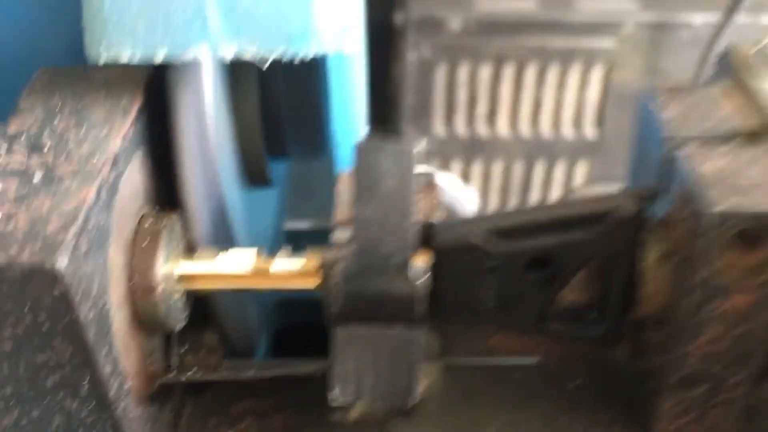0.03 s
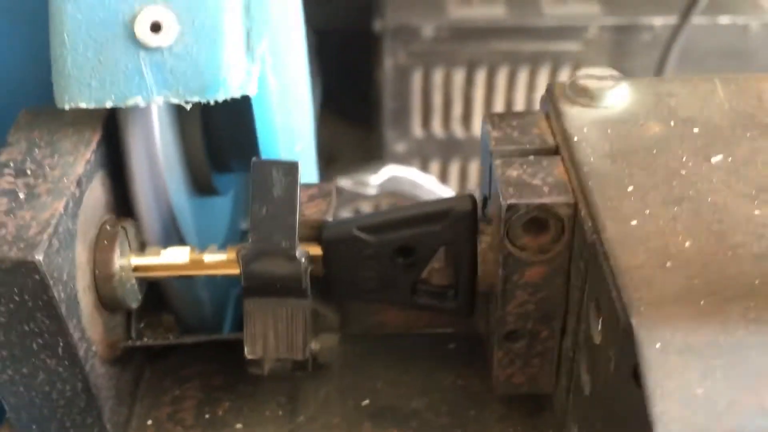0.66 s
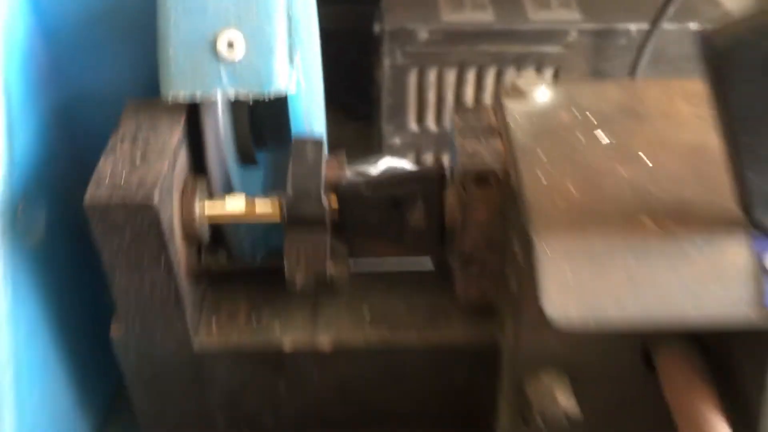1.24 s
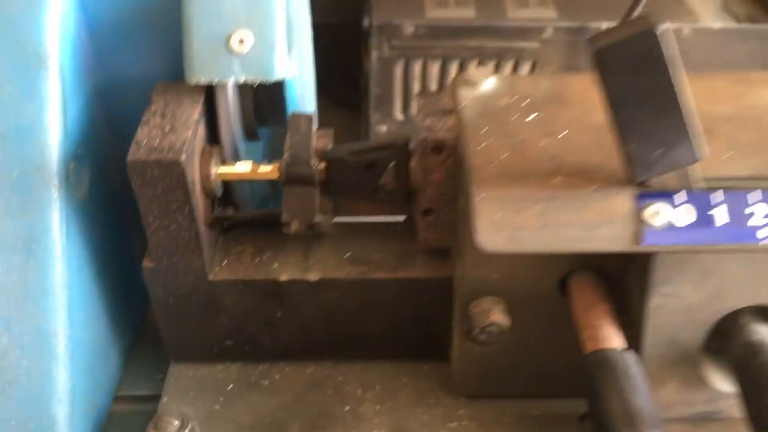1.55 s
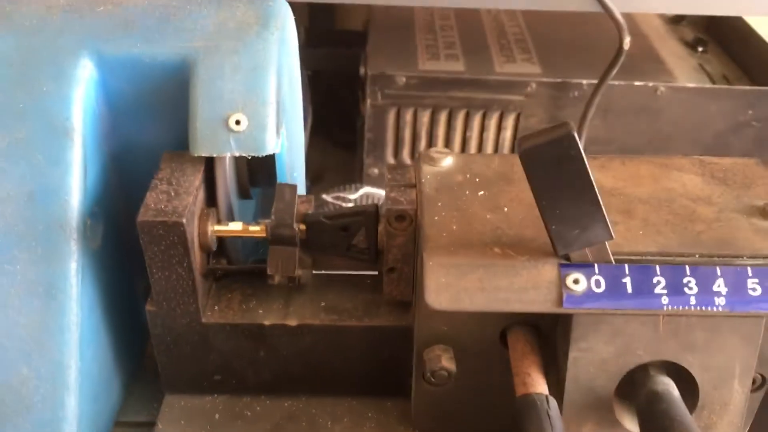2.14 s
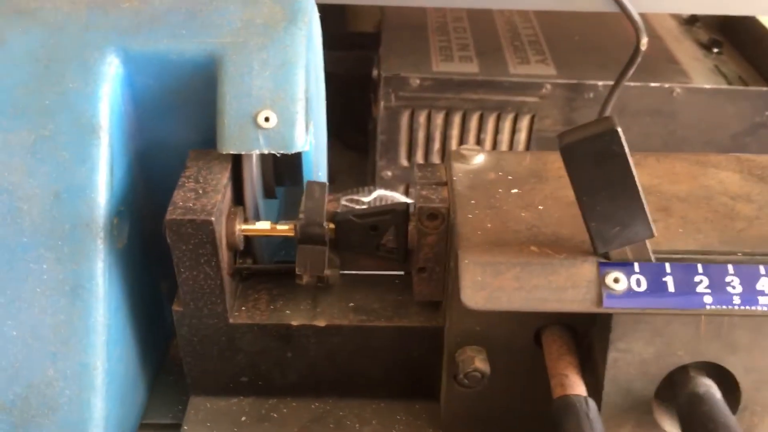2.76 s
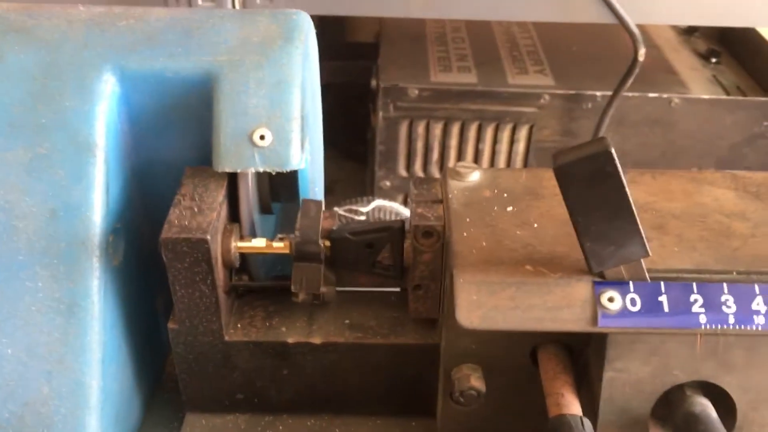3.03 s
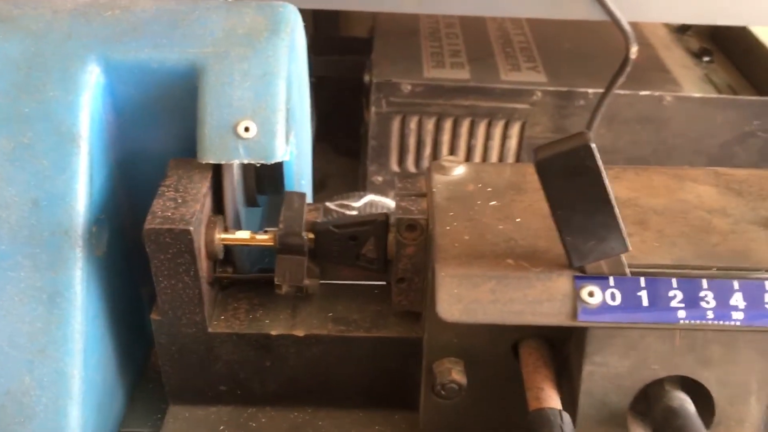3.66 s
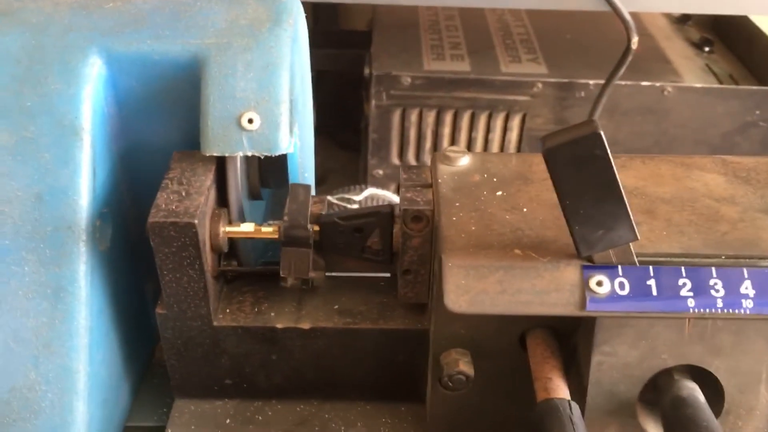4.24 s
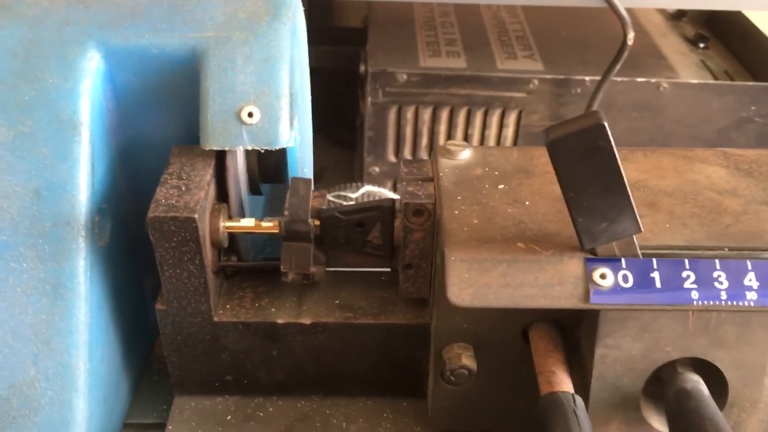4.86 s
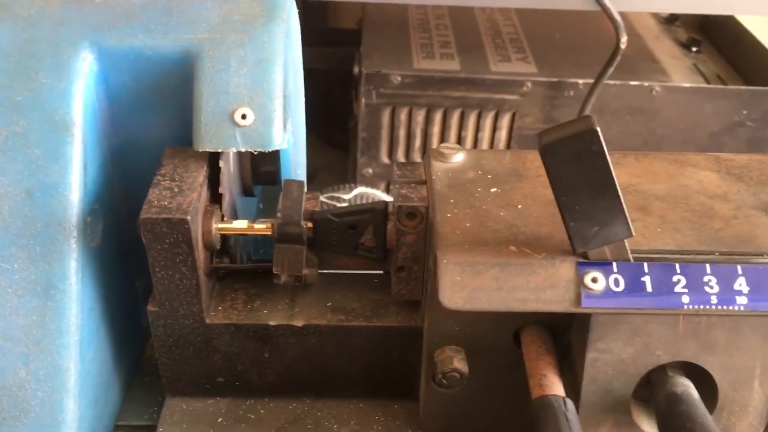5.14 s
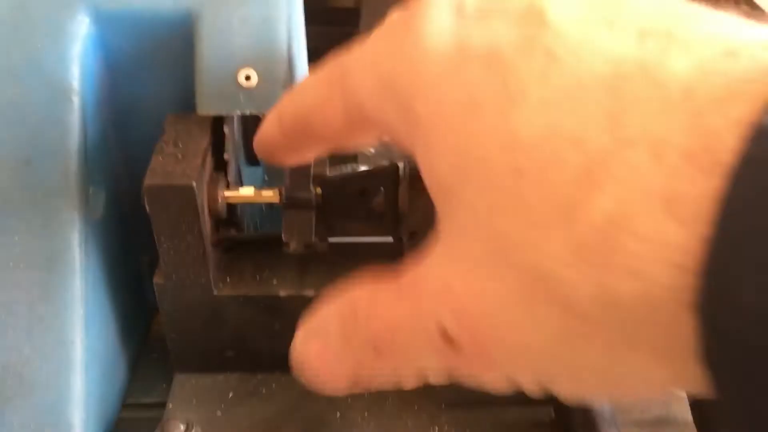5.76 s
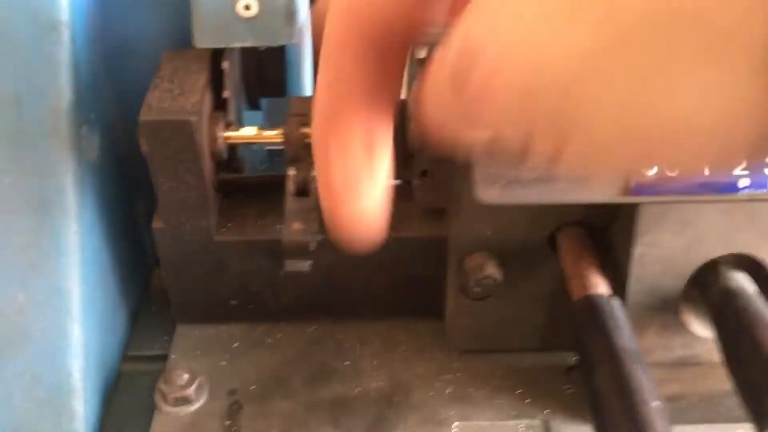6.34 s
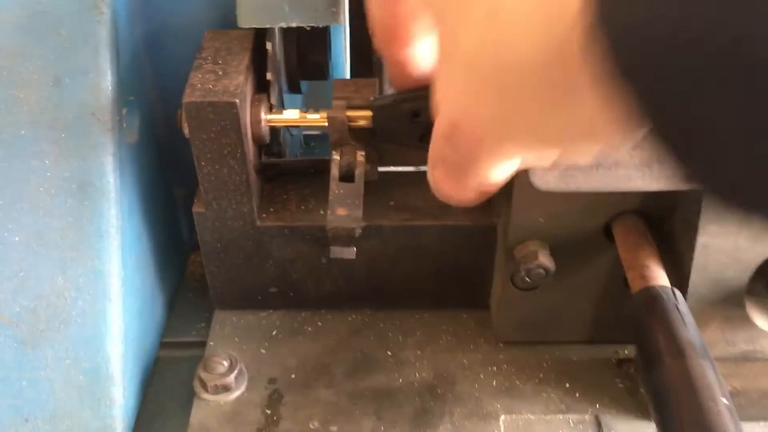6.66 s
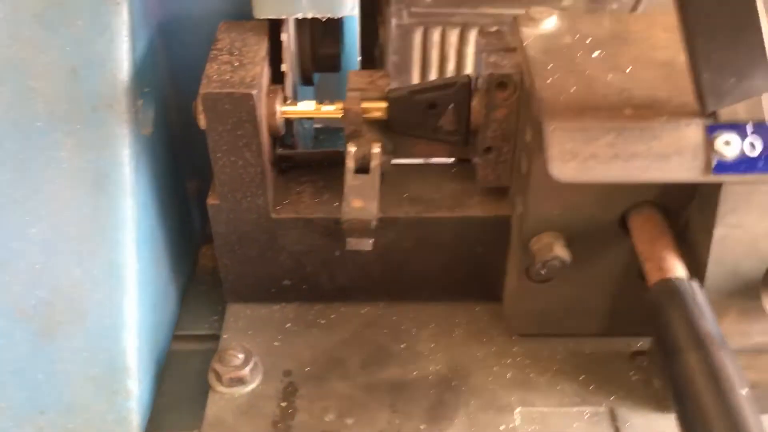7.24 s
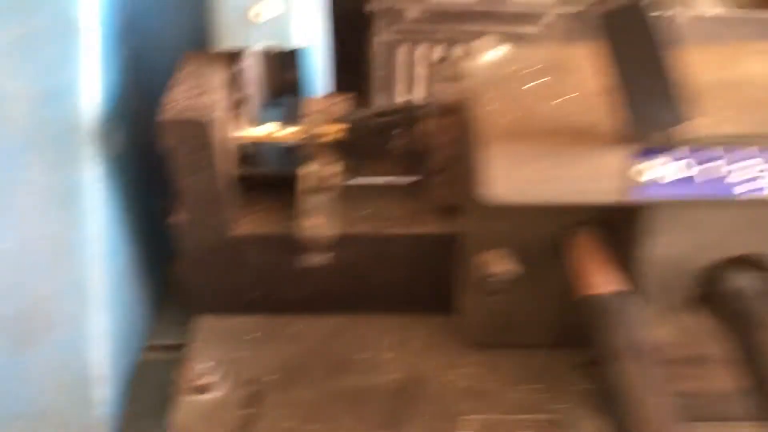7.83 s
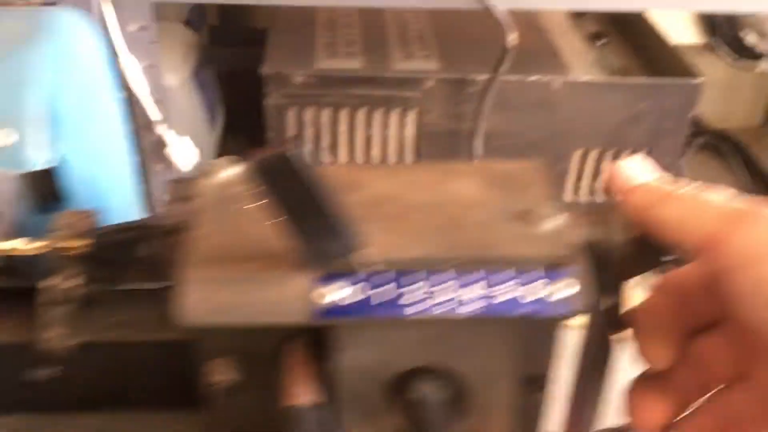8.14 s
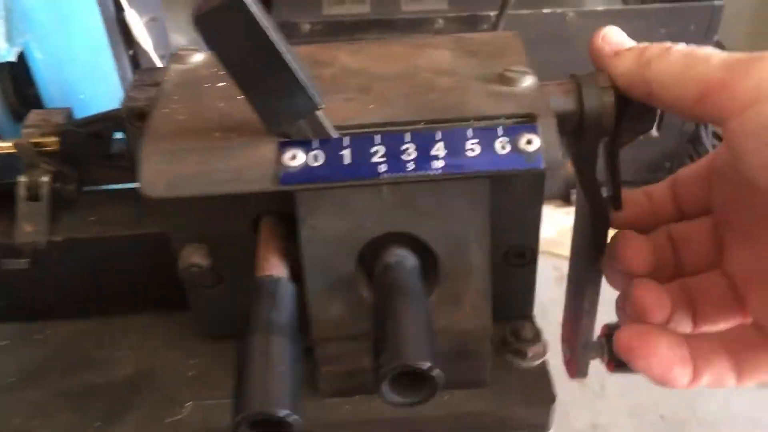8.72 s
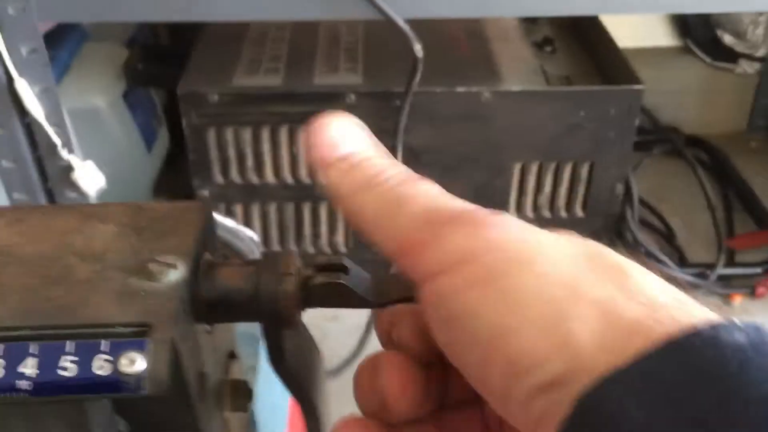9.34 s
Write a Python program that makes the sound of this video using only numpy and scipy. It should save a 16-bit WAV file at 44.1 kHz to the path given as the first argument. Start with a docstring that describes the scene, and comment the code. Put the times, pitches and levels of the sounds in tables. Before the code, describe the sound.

A key cutting machine is already running close to the microphone: a loud, harsh, whirring rasp and hiss over motor whine and hum, with dull housing booms in the first second. From about 0.6 to 1.9 seconds the sound softens slightly as the microphone draws back. At 2.4 seconds a switch snaps and the whine dies. The wheel coasts, with a low shudder near 3 seconds and a slowing swish. From 3.3 seconds it taps lightly and repeatedly on the key, then stops with a few clicks at 5 seconds. After a lull, the metal clamp clicks open around 6.2 to 6.4 seconds with a low thump, followed by small ticks and faint, squeaky scrapes. The steel carriage knocks with a short ring at 7.5 and 7.7 seconds. Soft sliding leads to a crank clunk near 9.4 seconds. A low workshop rumble lies underneath throughout.

```python
"""A harsh, whirring rasp close by: a key cutting machine, its rough wheel scraping the same way on every
turn over the whine and hum of the motor. The listener draws back, the switch snaps off and the wheel
coasts to rest, swishing once a turn and knocking on the key. A hand then clicks the clamp open, shifts
the steel carriage against its stops and takes hold of the crank, over a small workshop's low rumble."""
import sys
import numpy as np
from scipy import signal
from scipy.fft import rfft, irfft, next_fast_len
from scipy.io import wavfile

SR = 44100
rng = np.random.default_rng(int(sys.argv[2]) if len(sys.argv) > 2 else 0)


def inscribe(sig):
    """Save sig as 16-bit PCM at rate SR to the path in sys.argv[1].

    A 1-D sig is mono; a 2-D sig holds one channel per row.
    Samples are clipped to [-1, 1] before scaling.
    """
    pcm = np.round(np.clip(np.atleast_2d(sig).T, -1, 1) * 32767)
    wavfile.write(sys.argv[1], SR, pcm.astype(np.int16))


N = 418509
TIME = np.arange(N) / SR
FREQS = np.maximum(np.arange(N // 2 + 1) * SR / N, 1)
SWITCH_OFF_S, HIGH_SPOT_S = 2.43, 4.487  # turns are counted from this pass of the wheel's high spot

# shaft speed, steady under power, then braked by friction: time_s, turns_per_s
SHAFT_SPEED = [(0, 59.17), (2.41, 59.17), (2.52, 47), (3.52, 28.17), (4.457, 10.95), (4.99, 0)]
# waviness of the rim: waves_per_turn, width_waves, boost_db
RIM_WAVES = [(6.5, 1.6, 6), (10.2, 1.6, 9.5), (16, 2, 7), (22, 2, 4), (26, 1.2, 4), (30, 1.8, 6),
             (43, 2.6, 7), (67, 6, 3.5), (77, 5, 3.5)]
# nicks in the rim: after_high_spot_turns, relative_jolt_db
RIM_NICKS = [(-.01, 3.5), (0.27, 1.5)]
# tone curves of the wheel's rasp and the rim's hiss: frequency_hz, gain_db
RASP_COLOUR = [(30, -32.5), (50, -27), (170, -13.5), (260, -4.5), (520, -2), (720, 2.5), (1150, 0),
               (2200, -1), (3600, -1.5), (4700, -7), (5600, 1), (7000, -3), (8000, -14), (10000, -26)]
HISS_COLOUR = [(5000, -15.5), (7600, -7), (8600, -3), (9900, -2.5), (10450, -5.5), (11000, -3.5),
               (11900, -1.5), (12500, -1.5), (13300, -2), (15700, -5), (17000, -23.5)]
# resonances of the frame and of the wheel: pitch_hz, width_hz, gain_db
FRAME_RESONANCES = [(248, 80, 6.5), (449.6, 55, 9.5), (680, 80, -6), (870, 22, -9), (951, 50, 12.5),
                    (1037, 55, 5), (1500, 56, 5.5), (1710, 80, 8), (1985, 63, 7.5), (2403, 60, 8.5),
                    (2650, 89, 5), (2717, 91, 5), (2990, 170, 7), (3993, 48, 8.5), (4330, 100, 10),
                    (5100, 70, 1.5), (6240, 55, 5.5), (6980, 220, 8.5)]
WHEEL_RESONANCES = [(1225, 52, 5), (1578, 130, -2), (1800, 180, -6), (1990, 130, -5.5), (2260, 91, -5),
                    (2490, 100, -15), (2880, 90, 0.5), (3450, 180, -12), (4092, 100, -5.5), (4430, 150, -8),
                    (5216, 54, 4.5), (5610, 27, 6.5), (6020, 120, 4.5), (6590, 350, -3.5), (7180, 170, 3),
                    (8140, 250, -15.5), (9060, 170, 5.5), (11550, 300, -11.5)]
# whine of the driven shaft: harmonic, relative_near_db, relative_far_db
SHAFT_WHINE = [(1, -38, -46), (4, -32.5, -40.5), (5, -38, -44), (6, -44, -48), (7, -45, -48), (8, -46, -49),
               (9, -38, -45), (11, -46, -49), (16, -38, -38), (18, -44, -35), (20, -34, -43),
               (21, -44, -47), (22, -50, -44), (26, -35, -43), (27, -38, -43), (29, -42, -44),
               (30, -41, -45), (33, -30, -40), (34, -42, -48), (35, -40, -50), (38, -43, -49),
               (41, -45, -44), (43, -40, -49), (47, -47, -44), (48, -36, -40), (58, -44, -48),
               (60, -44, -52), (61, -42, -58), (68, -48, -44), (69, -42, -43), (76, -43, -51),
               (88, -36, -44), (90, -38, -50), (92, -41, -54), (94, -40, -52), (98, -36, -42),
               (100, -43, -45), (103, -38, -42), (111, -44, -44), (118, -42, -43), (120, -37, -50),
               (122, -37, -49), (123, -41, -48), (138, -42, -50), (150, -42, -50), (152, -35, -37),
               (153, -40, -39), (154, -40, -42), (155, -40, -38), (196, -41, -46)]
# mains hum in the motor: harmonic, relative_db
MAINS_HUM = [(2, -11), (4, -5), (5, -8), (6, -15), (7, -19), (10, -16)]
# the coasting wheel strikes the key: start_s, level_db
RIM_KNOCKS = [(3.291, -33), (3.344, -33), (3.377, -34.5), (3.441, -34), (3.476, -35), (3.546, -32.5),
              (3.584, -35), (3.659, -37), (3.737, -35), (3.780, -37), (3.868, -38), (3.914, -34.5),
              (3.962, -35), (4.012, -36), (4.067, -31), (4.123, -34), (4.183, -33.5), (4.246, -37),
              (4.272, -39), (4.319, -37), (4.339, -35), (4.396, -38), (4.425, -41), (4.486, -34),
              (4.519, -41), (4.590, -35), (4.612, -39), (4.632, -39.5), (4.746, -35.5), (4.790, -38)]

# ring of each struck metal part: pitch_hz, relative_db, t60_s
KEY_MODES = [(958, 2.5, 0.15), (1009, 2, 0.21), (1460, -2, .06), (1630, 0, 0.076), (1720, 3, 0.094),
             (1997, -1, 0.1), (2360, 0, 0.077), (2698, -4, 0.07), (2840, -10, 0.065), (3080, -11, .04),
             (4300, -4, .05)]
CLAMP_MODES = [(725, -17, 0.13), (998, -1, 0.13), (1210, 11.5, 0.083), (1510, -19, 0.15),
               (1760, -1.5, 0.11), (2450, -14.5, 0.17), (3100, -1, 0.068), (3500, 0.5, 0.07),
               (3700, -3, 0.11), (3930, 1.5, 0.06), (4270, -1, 0.05), (6460, -16.5, 0.09),
               (7337, -13.5, 0.045)]
CARRIAGE_MODES = [(295, -2, 0.33), (468, 5.5, 0.14), (613, -7, 0.2), (910, -3.5, 0.2), (1214, 4.5, 0.26),
                  (1240, -9, 0.51), (1390, -15, 0.28), (1690, -9, 0.35), (1800, -5, 0.2), (2360, -14, 0.26),
                  (2611, -1, 0.15), (2930, 0, 0.082), (3130, -3, 0.09), (3470, -12, .18), (3850, -4, 0.07),
                  (4500, -12, 0.16), (6160, -10, 0.18), (6640, -12, .16), (7060, -3, 0.091)]
CRANK_MODES = [(290, -2, 0.14), (540, -19, .08), (882, -6, 0.18), (1206, 6, 0.17), (1230, -12, 0.38),
               (1730, -19, .14), (2070, -15, .05), (2490, -16, 0.25), (2920, -10, 0.16)]
HOUSING_MODES = [(154, -22.5, 0.35), (244.1, 4.5, 0.28), (269, -3.5, 0.32), (312.3, -1.5, 0.27),
                 (491, -5.5, 0.11), (790, -7.5, 0.069)]
SPRING_MODES = [(146, 0, 3.6)]
# hard contacts, metal on metal: start_s, thud_db, ring_db, clack_db, tick_db
MACHINE_SNAPS = [(2.407, -53, -47, -28.5, -28), (4.865, -48, -42, -59, -43.5), (4.908, -48, -50, -54, -47)]  # the switch, then two snaps just before standstill
STOP_CLICK = [(4.9845, -51.5, -41.5, -44, -47)]  # the wheel seats as it stops
CLAMP_CLICKS = [(5.807, -62, -62, -73.5, -78), (6.204, -57, -54, -62, -64), (6.285, -53, -51, -49.5, -52),
                (6.293, -51, -48, -53, -57), (6.306, -57, -52, -54, -50), (6.315, -48, -35, -41, -52),
                (6.393, -44, -53, -62, -70), (6.413, -48, -52, -48.5, -50), (6.429, -41, -50, -53, -57),
                (6.722, -70, -58.5, -68, -74), (6.957, -59, -51.5, -69, -76),
                (6.993, -56.5, -70, -59.5, -69), (7.113, -58, -76, -77, -80), (7.187, -58, -72, -50, -65),
                (7.203, -64, -66, -63, -58), (7.219, -61, -72, -70, -56)]
CARRIAGE_KNOCKS = [(7.466, -43, -46.5, -37.5, -46), (7.471, -44, -37, -45, -53),
                   (7.499, -53, -49, -43, -59), (7.664, -50, -47.5, -41.5, -50),
                   (7.787, -63, -66, -69, -74), (8.112, -57.5, -71, -72, -74),
                   (8.262, -76, -68, -63.5, -81)]
CRANK_CLUNKS = [(9.024, -72.5, -79, -73, -63), (9.352, -50, -53, -56, -60),
                (9.360, -40, -33.5, -49.5, -47.5)]
# dull low booms in the housing, including a swelling shudder as the wheel slows: start_s, level_db
HOUSING_BOOMS = [(.004, -21.5), (0.037, -27), (0.148, -23.5), (0.21, -31.5), (0.29, -33), (0.775, -36.5),
                 (2.789, -44), (2.83, -39), (2.915, -40), (3.04, -43.5), (6.366, -44), (6.388, -35.5),
                 (6.472, -45), (9.362, -54)]

# fingers and carriage sliding over metal: middle_s, length_s, level_db
SLIDE_STROKES = [(5.465, 0.043, -62), (6.166, 0.15, -64), (6.285, 0.037, -55), (6.617, 0.1, -59.5),
                 (6.715, 0.09, -54), (6.807, 0.075, -64), (6.977, .06, -63), (7.2, 0.1, -57.5),
                 (7.892, .09, -66), (8.15, 0.13, -72), (8.427, 0.062, -66), (9.103, 0.07, -58),
                 (9.25, 0.12, -61.5)]
# squeaks of metal on metal: pitch_hz, width_hz, boost_db
SQUEAKS = [(2533, 120, 19), (5330, 160, 12), (9400, 320, 9)]
# tone curves of the sliding and of the workshop's rumble: frequency_hz, gain_db
SLIDE_COLOUR = [(300, 7), (1200, -6), (1900, -15), (3300, -2), (5000, -10), (7000, -1.5), (9500, 1),
                (10600, -1), (12000, 4), (15500, -3)]
ROOM_COLOUR = [(15, -57), (25, -14.5), (43, -2.5), (66, 0.5), (253, -16), (274, -17), (359, -20.5),
               (509, -29), (741, -27), (1240, -29.5), (1380, -34), (1900, -36), (2120, -38.5), (2920, -40),
               (15500, -40)]


def wheel(turns, speed):
    """Rim friction rasps through the frame, hisses and makes the wheel sing; all fade with speed."""
    pace = np.maximum(speed / speed[0], 3e-4)
    slowness, far = 1 - pace, drawn_back()
    let_go_s, creep_turns_per_s, standstill_t60_s = 0.052, 1.2, 0.58
    # after switch-off the rasp comes forward, then fades with speed while the singing dies away
    slack = 1 - np.exp(-since(SWITCH_OFF_S) / let_go_s)
    moving = 1 - np.exp(-speed / creep_turns_per_s)
    rasp_gain = from_db(-31.5 - 2.5 * far + 4 * slack) * pace ** 0.34
    hiss_gain = from_db(-24.5 - 1.2 * far) * pace ** 0.49 * moving
    singing_gain = from_db(-26 - 5 * far + 1.5 * slack) * pace ** 2

    frame = colour(RASP_COLOUR) * peaks(FRAME_RESONANCES, FREQS)
    ring_power = sum(from_db(db) ** 2 * bell(FREQS, hz, width) for hz, width, db in WHEEL_RESONANCES)
    ringing = np.sqrt(ring_power / (1 + (1200 / FREQS) ** 8))  # low cut at 1200 Hz
    scrape = rim_friction(turns, speed, grit_db=0.5) * nick_jolts(turns, slowness, decay_turns=0.25)
    rasp = rasp_gain * shaped(scrape, frame)
    hiss = hiss_gain * shaped(rim_friction(turns, speed, grit_db=0), colour(HISS_COLOUR))
    singing = singing_gain * shaped(rim_friction(turns, speed, grit_db=-2), ringing)
    swishing = (hiss + singing) * swish(turns, depth_db=4 + slowness, sharpness=4.6)
    stop_s = SHAFT_SPEED[-1][0]
    return (rasp + swishing) * decay(since(stop_s), standstill_t60_s)


def rim_friction(turns, speed, grit_db, rim_points=4096):
    """The rim's roughness comes round on every turn; fresh grit adds noise that never repeats."""
    phases = np.exp(2j * np.pi * rng.random(rim_points // 2))
    waves = peaks(RIM_WAVES, np.arange(rim_points // 2) + 1) * phases
    roughness = rms_one(irfft(np.r_[0, waves]))
    # trace the rim at twice the sample rate to keep the treble clean
    place = np.interp(np.arange(2 * N) / 2, np.arange(N), turns) % 1 * rim_points
    height = np.interp(place, np.arange(rim_points + 1), np.r_[0, np.cumsum(roughness)])
    slope = signal.resample_poly(np.diff(height, prepend=height[0]), 1, 2) * 2
    repeating = slope / np.sqrt(np.maximum(speed * rim_points / SR, 1))
    grit_gain = from_db(grit_db)
    return (repeating + grit_gain * rng.standard_normal(N)) / np.sqrt(1 + grit_gain ** 2)


def nick_jolts(turns, slowness, decay_turns):
    """Gain that jumps as each nick jolts the frame; slow jolts stand out more."""
    jolt_db = sum(db * np.exp(-((turns - place) % 1) / decay_turns) for place, db in RIM_NICKS)
    return from_db((0.8 + slowness) * (jolt_db - np.mean(jolt_db[:2 * SR])))


def swish(turns, depth_db, sharpness):
    """Gain that swells once a turn as the wheel's high spot presses harder."""
    press = ((1 + np.cos(2 * np.pi * turns)) / 2 + 1e-9) ** sharpness
    return from_db(depth_db * (press - np.mean(press[:2 * SR])))


def motor(turns):
    """The whining shaft slips behind the mains hum, so the two beat; both die after switch-off."""
    mains_hz, in_step_s = 60, 2.08
    far, since_off = drawn_back(), since(SWITCH_OFF_S)
    phase = rng.random(SHAFT_WHINE[-1][0] + 1)
    shaft_turns = turns - np.interp(in_step_s, TIME, turns)
    mains_cycles = mains_hz * (TIME - in_step_s)
    whine = np.zeros(N)
    for k, near_db, far_db in SHAFT_WHINE:
        gain = np.interp(far, [0, 1], from_db([near_db, far_db])) * wavering(per_s=5, depth_db=2)
        whine += gain * np.sin(2 * np.pi * (k * shaft_turns + phase[k]))
    hum = sum(from_db(db) * np.sin(2 * np.pi * (k * mains_cycles + phase[k])) for k, db in MAINS_HUM)
    whine_gain = decay(since_off, t60_s=0.09, start_db=-1)
    hum_gain = from_db(-34.5 - 7.5 * far) * decay(since_off, t60_s=0.28)
    return whine_gain * whine + hum_gain * rms_one(hum)


def key_knocks():
    """Each knock of the coasting wheel is a short crack that sets the key and its holder ringing."""
    out, t = np.zeros(N), np.arange(SR // 4) / SR
    crack_band = signal.butter(2, [900, 3200], "band", fs=SR, output="sos")
    for start_s, db in RIM_KNOCKS:
        burst = decay(t, t60_s=0.07, start_db=14.5) * rng.standard_normal(len(t))
        add_hit(out, start_s, db, modes(KEY_MODES, t) + signal.sosfilt(crack_band, burst))
    return out


def metal_clicks(contacts, part, crack_db, crack_t60_s, room_db, room_t60_s):
    """Each contact cracks, rings and dies in the room, with its own thud, ring, clack and tick levels."""
    out, t = np.zeros(N), np.arange(SR // 2) / SR
    edges_hz = [180, 750, 2200, 7800, 13000]  # thud, ring, clack and tick lie between these
    bands = [signal.butter(3, band, "band", fs=SR, output="sos") for band in zip(edges_hz, edges_hz[1:])]
    for start_s, *levels_db in contacts:
        ring = modes(part, t)
        for band, low_hz, db in zip(bands, edges_hz, levels_db):
            haste = (low_hz / 1000) ** 0.5  # the t60s hold for 1 kHz; the treble dies first
            crack = decay(t, crack_t60_s / haste, crack_db)
            room_tail = decay(t, room_t60_s / haste ** 0.5, room_db)
            noise = (crack + room_tail) * rng.standard_normal(len(t))
            add_hit(out, start_s, db, signal.sosfilt(band, ring + noise))
    return out


def housing_booms():
    """The sheet-metal housing resonates in low, swelling booms; the released clamp spring hums on."""
    out, t = np.zeros(N), np.arange(2 * SR) / SR
    swell = 1 - np.exp(-t / 0.01)
    for start_s, db in HOUSING_BOOMS:
        add_hit(out, start_s, db, modes(HOUSING_MODES, t) * swell)
    add_hit(out, start_s=6.39, level_db=-54, sound=modes(SPRING_MODES, t) * swell)
    return out


def sliding():
    """Each stroke swells and fades, catching and slipping as it goes, with a faint metal squeak."""
    catches_per_s, catch_db = 70, 4
    pressure = sum(from_db(db) * np.exp(-(2 * (TIME - middle_s) / length_s) ** 2)
                   for middle_s, length_s, db in SLIDE_STROKES)
    friction = shaped(rng.standard_normal(N), colour(SLIDE_COLOUR) * peaks(SQUEAKS, FREQS))
    catches = np.interp(TIME * catches_per_s, np.arange(N), rng.standard_normal(N))
    return pressure * from_db(catch_db * catches) * friction


def workshop_rumble():
    """Room tone: a steady bed of bass-heavy noise."""
    return from_db(-53.5) * shaped(rng.standard_normal(N), colour(ROOM_COLOUR))


def drawn_back(start_s=0.59, end_s=1.86):
    """The listener's even retreat: 0 close to the wheel, 1 drawn back."""
    return np.interp(TIME, [start_s, end_s], [0, 1])


def wavering(per_s, depth_db):
    """Slow random drift in the gain of one tone."""
    steps = rng.standard_normal(int(TIME[-1] * per_s) + 2)
    return np.interp(TIME * per_s, np.arange(len(steps)), from_db(depth_db * steps))


def modes(part, t):
    """Free ringing of a part, its tones balanced a little differently each time."""
    return sum(decay(t, t60_s, db + rng.normal(0, 2.6)) * np.sin(2 * np.pi * hz * t) * rng.choice([-1, 1])
               for hz, db, t60_s in part)


def add_hit(out, start_s, level_db, sound):
    """Mix in a one-shot whose first 20 ms have the given rms level."""
    start = round(start_s * SR)
    attack_rms = np.sqrt(np.mean(sound[:SR // 50] ** 2))
    out[start:start + len(sound)] += (from_db(level_db) * sound / attack_rms)[:N - start]


def shaped(x, gain):
    """Equalise a steady sound, keeping the power of white noise."""
    size = next_fast_len(N)
    gain = np.interp(np.arange(size // 2 + 1) * SR / size, FREQS, rms_one(gain))
    return irfft(rfft(x, size) * gain, size)[:N]


def colour(curve):
    """Gain at every frequency from a tone curve."""
    hz, db = np.transpose(curve)
    return from_db(np.interp(np.log(FREQS), np.log(hz), db))


def peaks(table, axis):
    """Gain of a set of bell-shaped boosts and cuts."""
    return from_db(sum(db * bell(axis, centre, width) for centre, width, db in table))


def bell(axis, centre, width):
    """Power response of one resonance."""
    return 1 / (1 + (2 * (axis - centre) / width) ** 2)


def decay(t, t60_s, start_db=0):
    """Envelope that falls 60 dB every t60_s."""
    return from_db(start_db - 60 * t / t60_s)


def since(start_s):
    """Seconds after a cue, zero before it."""
    return np.maximum(TIME - start_s, 0)


def from_db(db):
    """Decibels to gain."""
    return 10 ** (np.asarray(db) / 20)


def rms_one(x):
    """Scale to unit rms."""
    return x / np.sqrt(np.mean(x ** 2) + 1e-20)


def scene():
    """Machine, handling and room tone, alike in both channels."""
    speed = np.interp(TIME, *np.transpose(SHAFT_SPEED))
    turns = np.cumsum(speed) / SR
    turns -= np.interp(HIGH_SPOT_S, TIME, turns)
    mix = wheel(turns, speed) + motor(turns)
    mix += metal_clicks(MACHINE_SNAPS, CLAMP_MODES,
                        crack_db=28, crack_t60_s=0.13, room_db=8, room_t60_s=0.36)
    mix += key_knocks()
    mix += metal_clicks(STOP_CLICK, CLAMP_MODES,
                        crack_db=26, crack_t60_s=0.075, room_db=7, room_t60_s=0.41)
    mix += metal_clicks(CLAMP_CLICKS, CLAMP_MODES,
                        crack_db=19, crack_t60_s=0.041, room_db=-6.5, room_t60_s=0.81)
    mix += metal_clicks(CARRIAGE_KNOCKS, CARRIAGE_MODES,
                        crack_db=19.5, crack_t60_s=0.031, room_db=-5.5, room_t60_s=0.56)
    mix += metal_clicks(CRANK_CLUNKS, CRANK_MODES,
                        crack_db=13, crack_t60_s=0.057, room_db=-11, room_t60_s=0.67)
    mix += workshop_rumble() + housing_booms() + sliding()
    return np.tile(mix, (2, 1))


def record(dry):
    """A steep high cut takes off the very top."""
    cutoff_hz = 15850
    return signal.sosfilt(signal.ellip(12, 0.1, 80, cutoff_hz, fs=SR, output="sos"), dry)


dry = scene()
out = record(dry)
inscribe(out)
```